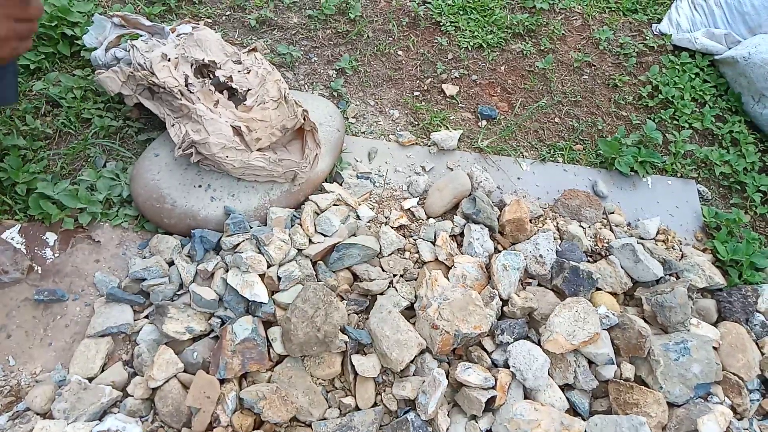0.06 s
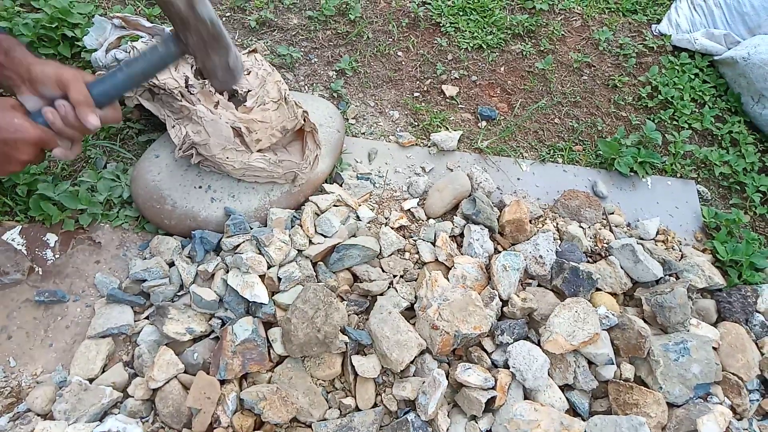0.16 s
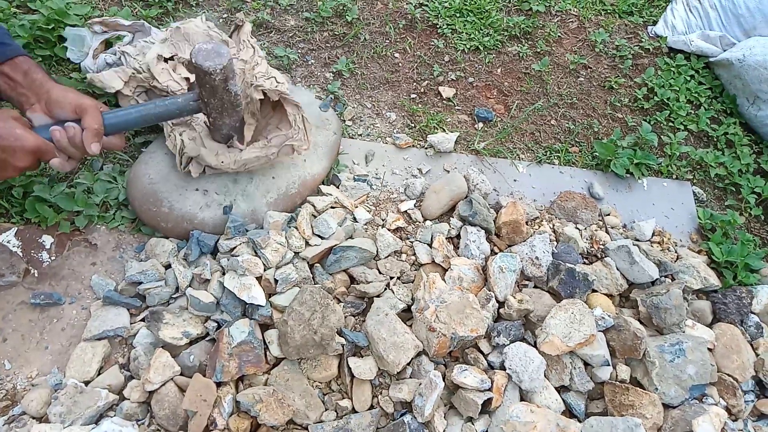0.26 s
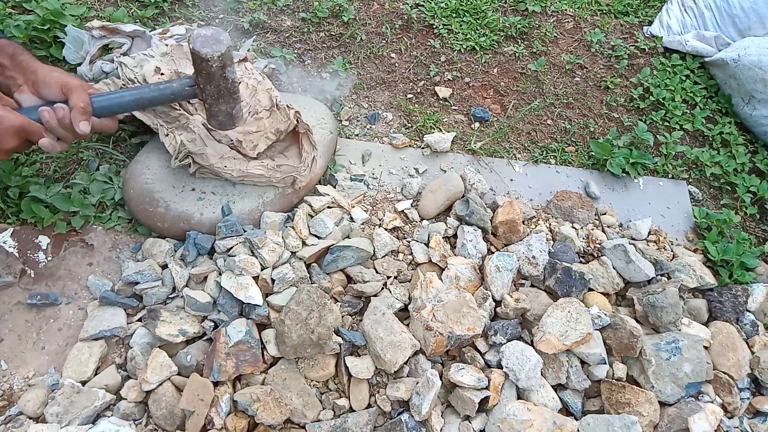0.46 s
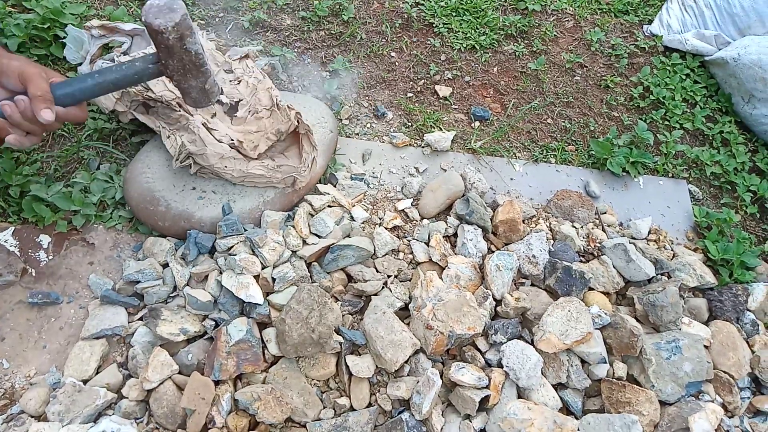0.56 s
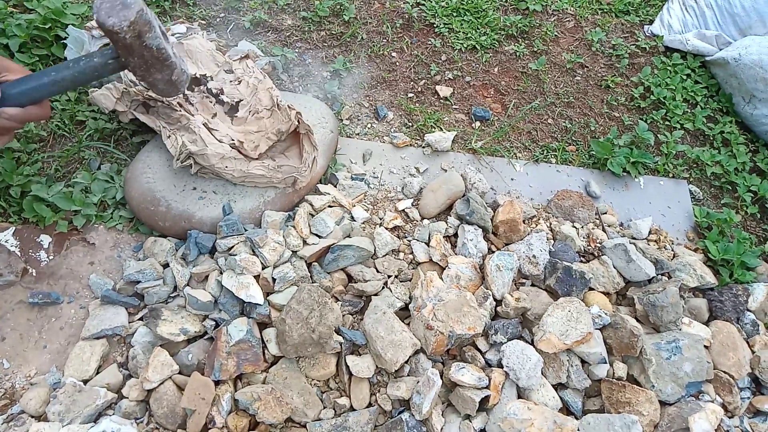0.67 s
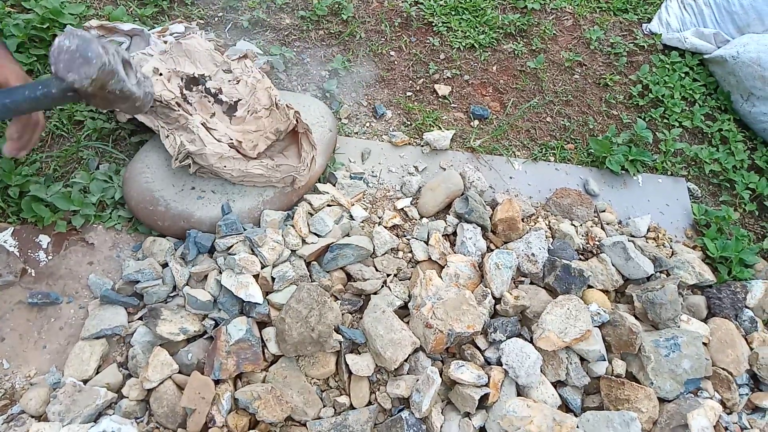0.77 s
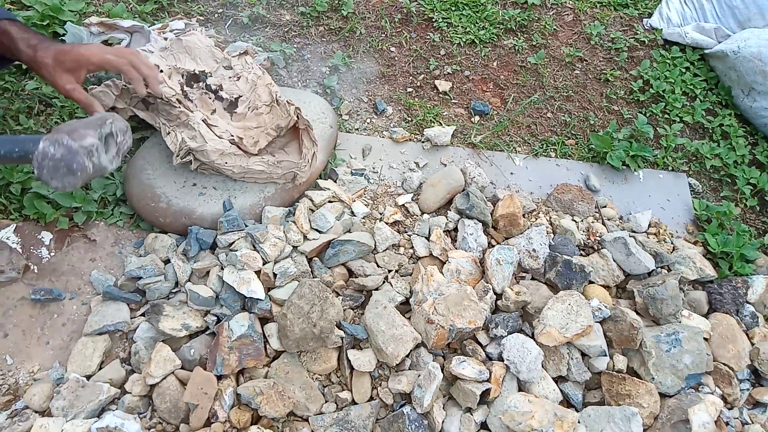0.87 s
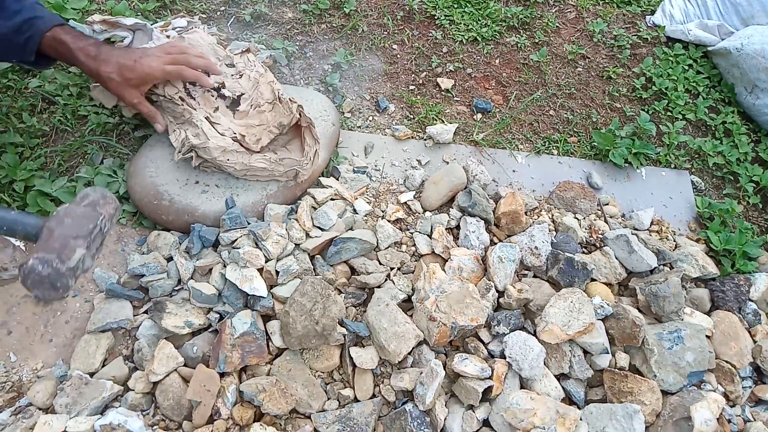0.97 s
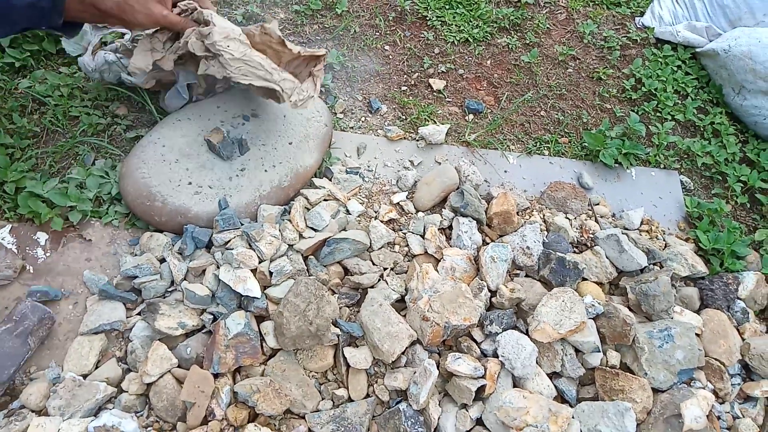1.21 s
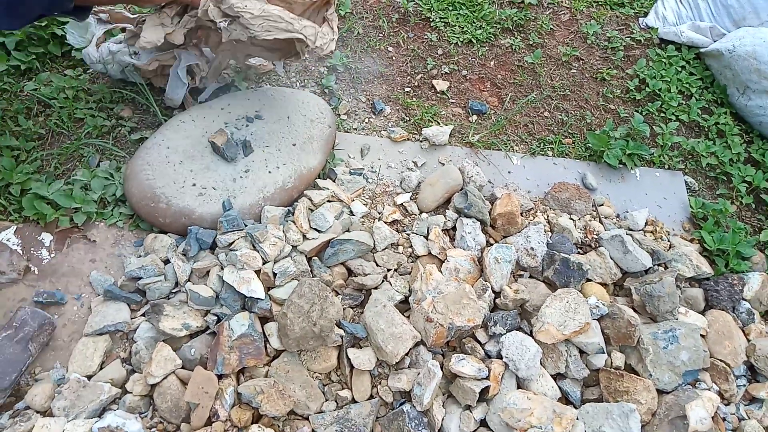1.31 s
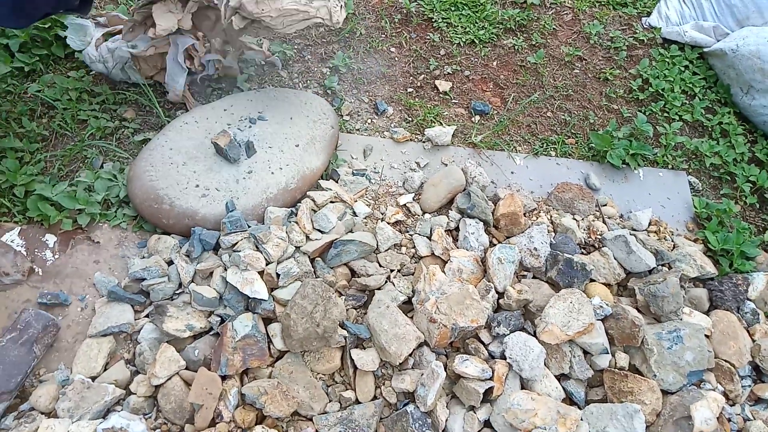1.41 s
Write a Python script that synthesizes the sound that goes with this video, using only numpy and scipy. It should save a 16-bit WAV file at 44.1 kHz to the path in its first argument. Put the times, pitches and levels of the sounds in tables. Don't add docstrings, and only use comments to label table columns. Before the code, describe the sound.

A sledgehammer cracks a wrapped rock at about 0.23 s: an abrupt, overloaded stony snap with an anvil thud, short high steel ring and crushed-grit hiss. Chips tick down, densest until 0.5 s, then sparse, with one clearer tap near 0.7. Paper rustles from 1.0 s. At 1.18 the head lands on loose stones, clattering hardest around 1.25, then crumbling away by 1.45. Close, dry, faint outdoor hum.

```python
import sys
import numpy as np
from scipy import signal
from scipy.fft import rfft, irfft
from scipy.io import wavfile
from scipy.ndimage import uniform_filter1d

SR = 44100
rng = np.random.default_rng(int(sys.argv[2]) if len(sys.argv) > 2 else 0)


def makeup_ratio(level_db):
    decades = np.asarray(level_db, float) / 20
    return 10 ** decades


def transcribe(u):
    v = np.clip(np.atleast_2d(u).T, -1, 1)
    q = np.round(v * 32767).astype(np.int16)
    wavfile.write(sys.argv[1], SR, q)


N = 63945
PORT_HZ = 4370
CLICK_LOW_HZ = 630


def in_time(rows):
    s, v = np.transpose(rows)
    return np.interp(np.arange(N) / SR, s, v)


def rms_one(x):
    return x / np.sqrt(np.mean(x ** 2) + 1e-20)


def cut(x, hz, kind, order):
    return signal.sosfilt(signal.butter(order, hz, kind, fs=SR, output="sos"), x)


def colour(x, points):
    size = 81920
    hz, db = np.transpose(points)
    grid = np.maximum(np.arange(size // 2 + 1) * SR / size, 1)
    log_gain = np.interp(np.log(grid), np.log(hz), db) * np.log(10) / 20
    ceps = irfft(log_gain)
    ceps[1:size // 2] *= 2
    ceps[size // 2 + 1:] = 0
    return irfft(rfft(x, size) * np.exp(rfft(ceps)))[:N]


def port(x):
    # (frequency [Hz], level [dB])
    port_curve = [(100, 0), (2500, -3.5), (3500, 1), (4200, -10), (5200, -34.5), (6500, -29), (7700, -43),
                  (9000, -29.5)]
    # (frequency [Hz], level [dB], frequency [Hz], level [dB])
    port_top = (10504.5, -52, 15501, -48)
    return colour(x, list(port_curve) + [port_top[:2], port_top[2:]])


def dying(s, db, t60):
    out = np.zeros(N)
    start = int(np.ceil(s * SR))
    end = min(N, start + int(2 * t60 * SR))
    t = np.arange(start, end) / SR - s
    out[start:start + len(t)] = makeup_ratio(db - 60 * t / t60)
    return out


def ring(s, hz, db, t60):
    out = dying(s, db, t60)
    on = np.flatnonzero(out)
    out[on] *= np.sin(2 * np.pi * hz * (on / SR - s))
    return out


def grains(per_s, spread_db):
    size = makeup_ratio(spread_db * np.minimum(rng.exponential(1, N), 4))
    size = size * rng.choice([-1, 1], N)
    return rms_one(size * (rng.random(N) < per_s / SR))


def hard(x, tone):
    return rms_one(port(colour(x, tone)))


def taps(rows, cycles, click_t60, partner_db):
    tones, clicks = np.zeros(N), np.zeros(N)
    noise = rng.standard_normal(N)
    ratios = rng.uniform(1.4, 2.24, len(rows))
    for (s, db, hz, click_db), ratio in zip(rows, ratios):
        t60 = cycles / np.sqrt(hz * 1500)
        tones += ring(s, hz, db + 4.5, t60)
        tones -= ring(s, hz, db + 6.0, 0.3 * t60)
        partner_hz = hz * ratio if hz < 1500 else hz / ratio
        tones += ring(s, partner_hz, db + partner_db, 0.014)
        clicks += dying(s, db + click_db, click_t60) * noise
    tones = cut(tones, PORT_HZ, "low", order=6)
    return cut(tones + port(clicks), CLICK_LOW_HZ / 2, "high", order=3)


def air():
    # (frequency [Hz], level [dB per Hz])
    air_tone = [(30, -16.5), (80, -0.5), (145, -3), (260, -12.5), (400, -26.5), (780, -9), (3490, -13.5),
                (5450, -39.5),
                (8740, -47.5), (16000, -55.5)]
    drift = uniform_filter1d(rng.standard_normal(N), size=900)
    drift = rms_one(uniform_filter1d(drift, size=900))
    hum = rms_one(colour(rng.standard_normal(N), [(15, -35.5)] + air_tone))
    return makeup_ratio(-55 + 2.5 * drift) * hum


def thuds():
    # (time [s], frequency [Hz], level [dB], t60 [s])
    bumps = [(.851, 140, -42, .07), (.399, 220, -39, .04), (1.243, 75, -37, .09), (.765, 160, -46, .06),
             (.325, 60, -43, .09)]
    return sum(cut(ring(s, hz, db, t60), 2 * hz, "low", order=2) for s, hz, db, t60 in bumps)


def paper():
    # (time [s], level [dB])
    pull = [
        (.98, -74.5),
        (1.03, -53),
        (1.08, -43),
        (1.12, -44.5),
        (1.15, -50.5),
        (1.3, -57.5),
        (1.45, -47.5),
    ]
    # (frequency [Hz], level [dB])
    paper_tone = [(200, -19), (500, -15), (1100, -4), (1700, 0.5), (2300, -10), (3400, -6), (6000, 1.5),
                  (15000, 1.5)]
    held = np.arange(N) / SR > pull[0][0]
    return makeup_ratio(in_time(pull)) * held * hard(grains(4500, 4.4), paper_tone)


def splinters():
    # (time [s], peak level [dB])
    ticks = [(.017, -57), (.154, -60), (.187, -64), (.2, -62), (0.333, -41), (.365, -43), (0.3997, -32),
             (.427, -40), (0.45, -42.5), (.468, -56), (0.4777, -39), (.481, -50), (0.499, -39), (.614, -54),
             (.619, -57), (0.705, -53), (.747, -53), (0.77, -57), (0.842, -69.5), (0.965, -64), (.996, -62),
             (1.015, -52), (1.2036, -38), (1.241, -37), (1.245, -38), (1.253, -42), (1.27, -42)]
    # (frequency [Hz], level [dB])
    splinter_tone = [(2500, -45), (3800, 2), (5200, -7), (6300, 2), (7600, -8), (8900, -4), (11500, -13.5),
                     (15400, -15)]
    envelope = sum(dying(s, db, 0.0071) for s, db in ticks)
    return colour(rng.standard_normal(N) * envelope, splinter_tone)


def chips():
    # (time [s], peak level [dB], pitch [Hz], share of bright click [dB])
    landings = [(.017, -35, 2380, 0), (.088, -34, 2860, -13), (.124, -35.5, 2220, -4.5),
                (.154, -30.5, 1950, -1.5), (.187, -29, 2620, 1), (.3035, -14, 1610, -3),
                (.3065, -19, 1090, -10), (.3095, -14, 1365, -8), (.3100, -12, 625, -20),
                (.331, -11.5, 3410, -15), (.354, -25, 594, -9), (.374, -23, 1140, -8),
                (.399, -22, 483, -14), (.4225, -28, 1096, 1), (.451, -32, 1260, -3),
                (.4745, -25.5, 3400, -5), (.498, -27.5, 3350, 6), (.5085, -36, 1840, 4),
                (.558, -38, 3220, -3), (.613, -39, 2100, -3.5), (.673, -36, 3640, -9.5),
                (.705, -21, 2170, -7), (.7055, -26.5, 820, -26), (.747, -36.5, 2040, 0.5),
                (.7715, -36.5, 1580, 0), (.844, -36.5, 1506, 6.5), (.9635, -29.5, 990, 3),
                (1.017, -33, 3300, -11), (1.045, -35.5, 1440, -10.5), (1.167, -27.5, 3250, 4.5),
                (1.169, -28, 1400, -24), (.2255, -19, 1480, -11), (.2405, -13, 1110, -5),
                (.2435, -16.5, 706, -12), (.2548, -19, 1480, 3.5), (.341, -30, 1400, -14),
                (.387, -27, 1790, -8), (.4205, -28, 1140, -8), (.531, -36, 1870, -12),
                (.172, -39, 1380, -10), (.2, -40, 2000, -2), (.996, -39, 2210, -3), (1.077, -33, 1100, -10),
                (1.087, -27, 3300, -14), (1.099, -33.5, 1770, -10), (.332, -22, 2950, -21)]
    tapping = taps(landings, cycles=10.5, click_t60=0.015, partner_db=-12.5)
    return cut(tapping, CLICK_LOW_HZ, "high", order=2)


def heap():
    drop_s, heap_low_hz = 1.1767, 150
    # (frequency [Hz], level [dB], t60 [s], sign, lag [s])
    drop_modes = [(237, -4.5, 0.019, 0.89, .0014), (582, -5, 0.017, -0.66, 0.00023),
                  (670, -2, 0.015, -.8, 0.00019), (1200, -17.5, 0.00585, -0.9, 0.00026),
                  (3300, -21, 0.0085, 0.96, 0.00046)]
    # (time [s], peak level [dB], pitch [Hz], share of bright click [dB])
    knocks = [(1.1866, -12.5, 1500, -11), (1.192, -8, 594, -19), (1.1991, -3, 900, -7.5),
              (1.2022, -15, 784, 4.5), (1.2045, 0, 1083, -10), (1.2125, -25, 1200, -15),
              (1.2255, -17, 1610, -22), (1.2396, -17, 1470, -15), (1.2445, -6.5, 2080, -18),
              (1.2470, 1.5, 1703, -5), (1.2512, 1, 1580, -14), (1.2583, -11, 1110, -9),
              (1.2695, -12.5, 620, -14), (1.2728, -15.5, 735, -4), (1.279, -19, 880, -14),
              (1.287, -12, 715, -12), (1.302, -25.5, 576, -4), (1.318, -19.5, 560, -4),
              (1.331, -22, 627, -22), (1.339, -18, 1640, -7), (1.3575, -33, 1780, -13),
              (1.3615, -20, 1390, -20), (1.376, -20.5, 1590, -1.5), (1.380, -18.5, 1760, -14),
              (1.392, -25, 1520, -17), (1.4015, -32, 1600, -8), (1.4155, -27, 1800, 2.5),
              (1.423, -27.5, 630, -13), (1.436, -26.5, 900, -8), (1.2175, -23, 1200, -12),
              (1.2205, -19.5, 690, -15), (1.231, -20, 700, -21), (1.2405, -14, 600, -20),
              (1.2455, -10, 3310, -19), (1.2525, -7, 3460, -17), (1.2555, -14, 1330, -16),
              (1.2612, -20, 1550, -13), (1.265, -15.5, 1390, -17), (1.2698, -12, 1610, -7),
              (1.2755, -14.5, 1800, -7), (1.2925, -23, 1410, -7), (1.257, -19, 3400, -20),
              (1.261, -22, 3500, -20), (1.297, -23.5, 850, -11), (1.329, -24, 1510, -14),
              (1.383, -27.5, 1710, -15), (1.3965, -27, 1400, -13), (1.4175, -34, 900, -15),
              (1.378, -29, 300, -20)]
    # (time [s], level [dB])
    shift = [
        (1.175, -61),
        (1.18, -20.5),
        (1.207, -23.5),
        (1.234, -36.5),
        (1.24, -18.5),
        (1.25, -15.5),
        (1.285, -28.5),
        (1.34, -47.5),
        (1.45, -49),
    ]
    # (frequency [Hz], level [dB])
    shift_tone = [(40, -34), (200, 3), (400, -3), (600, 2.5), (1500, 6.5), (2500, -8), (3500, -11),
                  (15000, -5.5)]
    # (frequency [Hz], level [dB])
    crumb_tone = [(150, -38), (550, 7), (1000, 5.5), (1700, 4), (2500, -18), (15000, -30)]

    landing = sum(sign * ring(drop_s + lag, hz, db, t60) for hz, db, t60, sign, lag in drop_modes)
    landing = cut(landing, [0.78 * heap_low_hz, PORT_HZ], "band", order=3)
    knocking = taps(knocks, cycles=12.8, click_t60=0.014, partner_db=-14.0)
    swing_db = in_time(shift)
    grind = makeup_ratio(swing_db) * hard(grains(5000, 2.43), shift_tone)
    grind += makeup_ratio(-19 + 0.52 * swing_db) * hard(grains(320, 4.2), crumb_tone)
    grind = cut(grind, heap_low_hz, "high", order=3)
    return (landing + knocking + grind) * (np.arange(N) / SR > shift[0][0])


def blow():
    touch_s, blow_s = .2235, .2295
    # (frequency [Hz], level [dB], t60 [s])
    rock = [(528, -17, 0.063), (621.4, -6.5, 0.041), (710, -12.5, 0.038), (930, -15, 0.058),
            (1042, -28.5, .08), (1164, -10, 0.045), (1283, -17, 0.049), (1515, -17, 0.026),
            (1784, -20, 0.055), (3100, -14, 0.049)]
    # (frequency [Hz], level [dB], t60 [s])
    anvil = [(84, -25.5, 0.091), (138.7, -13, 0.06), (216.6, -7.5, 0.031), (283, -28.5, 0.032)]
    # (frequency [Hz], level [dB], t60 [s])
    steel = [(3416, -23.5, 0.29), (3460, -23.5, 0.11), (3415, -8, 0.042), (3350, -17.5, 0.0087),
             (3730, -18, 0.034), (6060, -27.5, .015)]
    # (frequency [Hz], level [dB], t60 [s])
    sing = [(7202, -54, .34), (8894, -45.5, .65), (13170, -59, .07), (3919, -34, .3)]
    # (time [s], level [dB])
    grip = [
        (0, 0),
        (.49, 0),
        (.62, -14),
        (1.45, -60),
    ]
    # (level [dB], t60 [s], density [grains per s])
    grit = [
        (-19.5, 0.15, 8100),
        (-31.5, 0.92, 3000),
    ]
    # (frequency [Hz], level [dB])
    grit_tone = [(40, -15), (150, -0.5), (350, -8.5), (700, 0), (3000, -5), (7500, 4), (9000, 3),
                 (15000, 5)]

    burst = dying(blow_s, 5.5, 0.021) + dying(touch_s, -25, 0.12)
    out = cut(port(rng.standard_normal(N) * burst), 900, "high", order=2)
    out += sum(ring(blow_s + 0.001188, *mode) for mode in rock)
    out -= sum(ring(blow_s, *mode) for mode in steel)
    out += makeup_ratio(in_time(grip)) * sum(ring(blow_s, *mode) for mode in sing)
    out -= sum(ring(blow_s + .00005, *mode) for mode in anvil)
    out += ring(.333, 3910, -33, 0.083)
    for db, t60, per_s in grit:
        out += dying(blow_s, db, t60) * hard(grains(per_s, 3.54), grit_tone)
    return out


def scene():
    background = air() + thuds() + paper()
    debris = splinters() + chips()
    return (background + debris + heap() + blow())[None]


def top_cut(x):
    return signal.sosfilt(signal.butter(12, 16380, fs=SR, output="sos"), x)


def record(dry):
    # (time [s], gain [dB])
    duck = [
        (0, 0),
        (.2, 2),
        (.212, -14),
        (.222, -10),
        (.225, 1.5),
    ]
    ceiling, knee = .95, 9.0
    fade_out = np.clip((N - np.arange(N)) / 40, 0, 1)
    x = cut(dry, 63, "high", order=2) * makeup_ratio(in_time(duck)) * fade_out
    x = x / (1 + np.abs(x / ceiling) ** knee) ** (1 / knee)
    treble_limit = signal.ellip(10, .5, 45, 15480, fs=SR, output="sos")
    return top_cut(signal.sosfilt(treble_limit, x))


dry = scene()
out = record(dry)
transcribe(out)
```